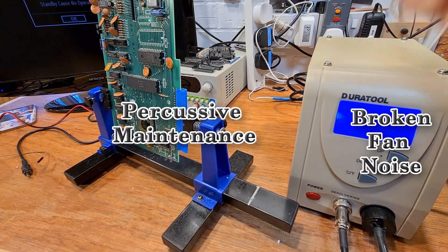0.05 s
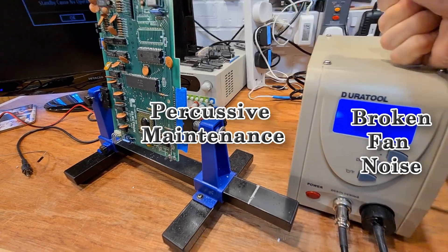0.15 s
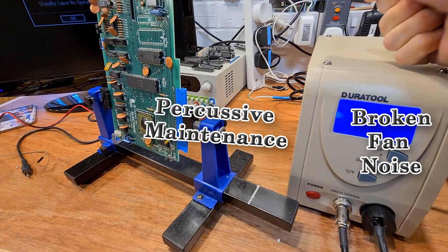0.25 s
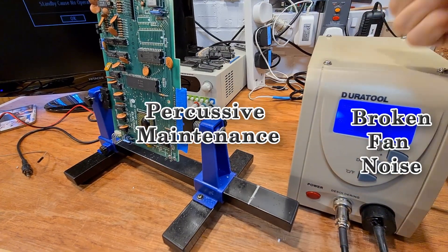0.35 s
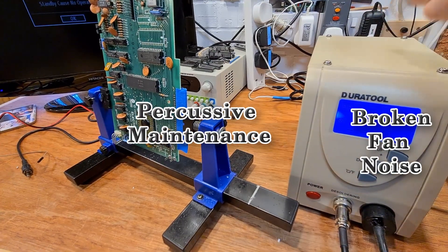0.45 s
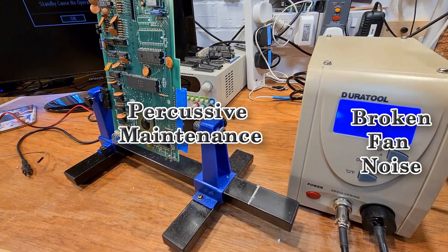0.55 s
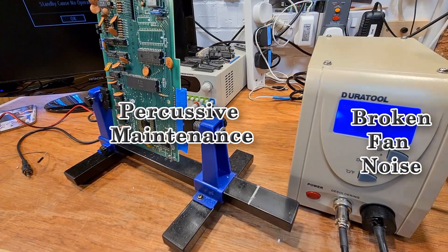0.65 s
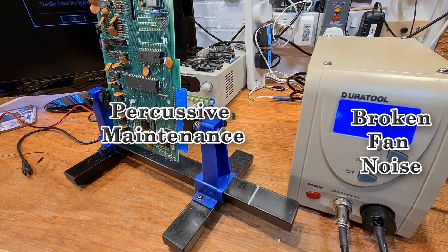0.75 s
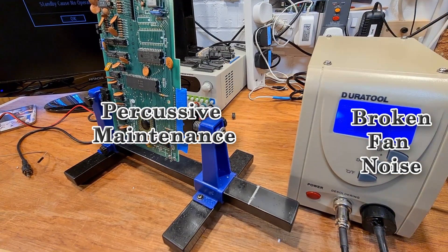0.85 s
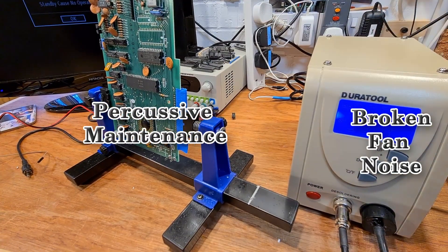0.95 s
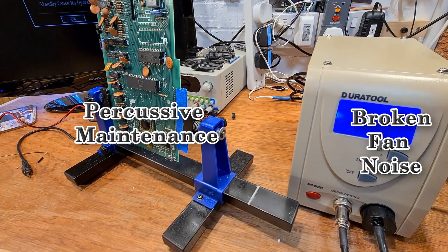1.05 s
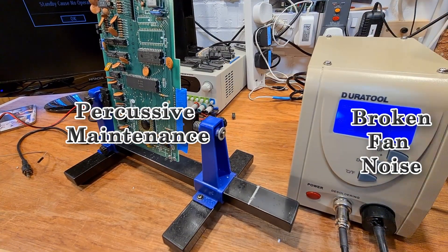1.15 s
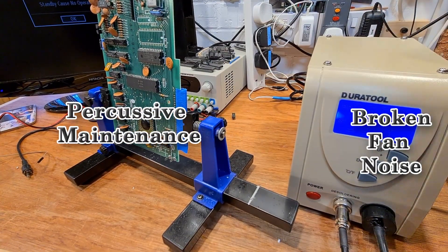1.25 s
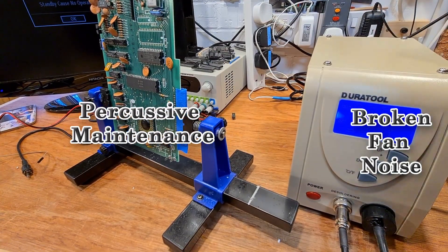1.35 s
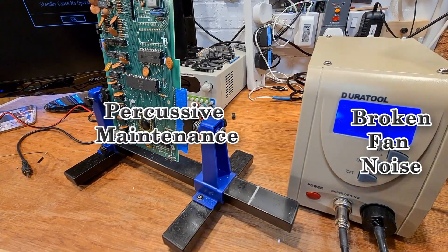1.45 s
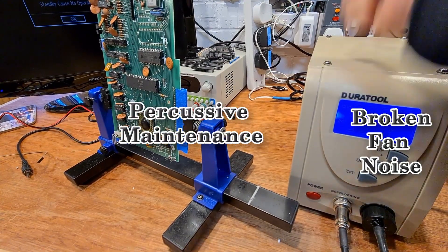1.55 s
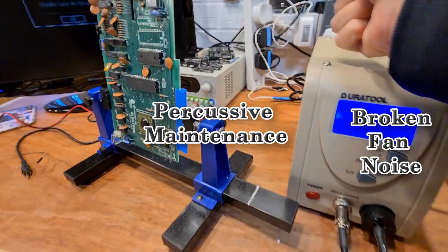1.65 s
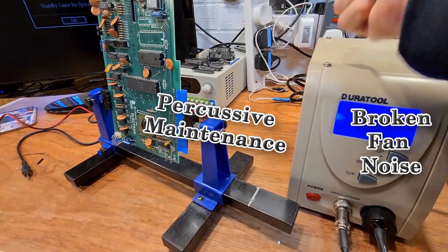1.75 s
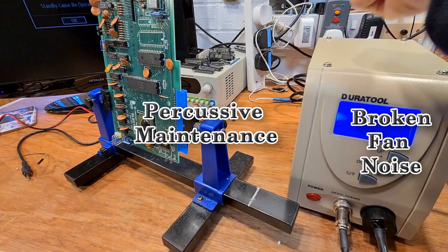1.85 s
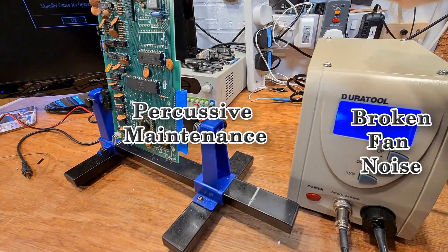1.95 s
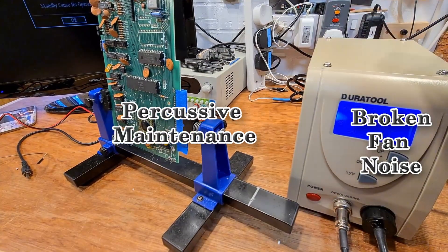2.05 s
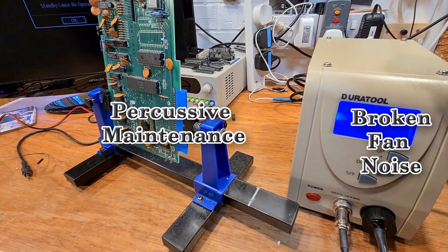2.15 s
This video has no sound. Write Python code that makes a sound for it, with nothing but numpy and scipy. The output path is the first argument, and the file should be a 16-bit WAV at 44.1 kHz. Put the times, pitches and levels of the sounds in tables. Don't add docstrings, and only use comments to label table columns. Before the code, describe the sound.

Buzzing faulty fan in a metal case, struck by two hard knocks that briefly lower its pitch

```python
import sys
import numpy as np
from scipy import signal
from scipy.fft import rfft, irfft, next_fast_len
from scipy.io import wavfile

SR = 44100
rng = np.random.default_rng(int(sys.argv[2]) if len(sys.argv) > 2 else 0)


def wav_out(sig):
    wavfile.write(sys.argv[1], SR, np.round(np.clip(np.atleast_2d(sig).T, -1, 1) * 32767).astype(np.int16))


def to_linear_factor(level_db):
    exponent = np.asarray(level_db, float) / 20
    return 10 ** exponent


N = 97020

# pitch_hz, level_db_per_hz
FLOOR_COLOUR = [(25, -34), (65, -1.5), (120, -10), (280, -12), (390, -27), (750, -17.5), (930, -38),
                (1600, -24)]
FLOOR_DB, FLOOR_PATCH_DB = -54, 0.5
# pitch_hz, t60_s (time to fade by 60 dB), level_db
FLOOR_TONES = [(71, 0.75, -58.5), (164, 0.6, -56), (301, 0.083, -54), (541.4, 0.41, -68), (735, 0.15, -66)]
SWAY_START_S, SWAY_RISE_S, SWAY_HZ, SWAY_DB = 1.89, 0.1, 60.6, -39.5

GRIND_ALIKE, FLOOR_ALIKE, SHUDDER_ALIKE = 0.19, 0.8, 0.62

KNOCKS_S = [
    .205,
    1.695,
]
# pitch_hz, level_db_per_hz
SHUDDER_COLOUR = [(100, 0), (350, -1), (800, -15), (1500, -17), (3000, -27), (7000, -35), (9000, -44),
                  (15000, -40)]
SHUDDER_DB, SHUDDER_HOLD_S, SHUDDER_T60_S = [-18.5, -20], 0.054, 0.13

# start_s, level_db, pitch_hz, ring_ms
CHATTER = [(.2025, -18, 3000, 6), (.2042, -21, 11000, 4), (.2145, -13, 3600, 9), (.2148, -22, 9500, 7),
           (.231, -17, 5500, 7), (.2385, -17, 5000, 5), (.2465, -19, 5000, 5), (.254, -19, 2400, 6),
           (.261, -22, 3500, 5), (.2775, -20, 6000, 6), (1.697, -11, 12000, 8), (1.6975, -16, 2900, 9),
           (1.7015, -19, 2900, 5), (1.7185, -19, 6000, 5), (1.7295, -19, 6500, 5), (1.730, -24, 11000, 4),
           (1.736, -18, 5000, 8), (1.7535, -14, 4600, 7), (1.754, -20, 10500, 6), (1.7685, -18, 5000, 5)]

# start_s, level_db, contact_ms
PUSHES = [
    (0.2025, -26, 0.89),
    (.207, -11, 1.97),
    (0.2132, -11.5, 0.88),
    (.217, -14.5, 0.21),
    (.250, -27.5, 1.43),
    (1.693, -16, 1.8),
    (1.6957, -8.5, 1.12),
    (1.7084, -17.5, 0.4),
    (1.726, -22, 2.1),
    (1.755, -30, 1.6),
]
# pitch_hz, first_knock_db, second_knock_db, t60_s
CASE_MODES = [(42.9, -19.5, -12.5, 0.68), (63.3, -3, -12.5, 0.47), (76.9, -5.5, -14.5, 0.47),
              (108.4, -22, -3, 0.19), (190.9, -7, -11.5, 0.278), (231.9, -8, -2.5, 0.2),
              (318.4, -7, -6.5, 0.16), (401, -9, -27, 0.12), (557, -22, -11, .12),
              (748.7, -12.5, -14, 0.18), (216, -2, 1, 0.068), (1115, 1, -18, 0.048), (1276, 0, -11, 0.15),
              (1953, -9, -10, 0.3)]

FREE_HZ, START_CYCLE = 213, 0.1
BRAKE_HZ, BRAKE_S, RECOVER_S = 21.07, 0.03, 0.33
LEFTOVER_HZ = 2.5
HUM_DB, HUM_WOBBLE_DB = -30.5, 0.83
OCTAVE_DB = -23
# multiple_of_hum, level_db
OVERTONES = [(3, -49), (4, -52), (5, -37), (6, -30), (7, -37), (22 / 3, -32), (8, -41), (9, -38), (10, -37),
             (11, -38), (34 / 3, -37), (13, -34), (40 / 3, -29), (14, -32), (46 / 3, -29), (17, -32),
             (55 / 3, -30), (61 / 3, -29), (65 / 3, -27)]
OVERTONE_DB, OVERTONE_WAVER_DB = 7, 2.0
BRAKED_OVERTONE_DB = 18

# place_cycles (0 to 1), level_db
RUBS = [
    (.5, 9),
    (.05, -8),
]
RUB_DB, RUB_SPREAD_DB, RUB_DRIFT_DB = -39, 1, 1.5
RUB_JITTER = 0.012
BRAKED_RUB_DB = 2.5
TICK_TOP_HZ = 7400
GRIND_DB, GRIND_FLUTTER_DB = 0.5, 0.6
GRIND_GATE = 0.35
# pitch_hz, level_db_per_hz
RUB_COLOUR = [(1500, -10), (3000, -8), (4650, -1), (6100, -13), (7700, -8.5), (9900, -12), (12700, -7.5),
              (15500, -9)]
# pitch_hz, level_db
RUB_DIP = [(1, 1), (7750, 0), (8050, -10.5), (9500, -7), (9800, 0.5)]
# pitch_hz, width_hz, level_db
FRAME = [(1970, 64, 4), (3007, 23, 0.5), (3590, 76, 3), (3870, 30, -8), (4400, 27, 6), (4654, 57, 2),
         (4830, 99, -1), (5403, 20, 3.5), (7730, 450, -2.5), (12900, 110, -5), (13700, 150, -21)]
FRAME_DB = -45.5

# pitch_hz, left_minus_right_db, left_lead_radians
PAIR = [(60, -0.5, 0.5), (216, -1.5, -0.08), (564, 1, -1.5), (1200, -3, -2), (2220, 1, -5.0),
        (4280, 5.5, -6.5), (8000, 4, -10.5), (15500, 7, -20.0)]
HUM_LEFT_DB = 4.5
ECHO_DB, ECHO_T60_S, ECHO_LOW_HZ = -8, 0.1, 510


def at_hz(points, hz, column):
    p = np.array(points, float)
    return np.interp(np.log(np.maximum(hz, 1)), np.log(p[:, 0]), p[:, column])


def rms_one(x):
    return x / np.sqrt(np.mean(x ** 2) + 1e-20)


def colour(x, points):
    size = 2 * next_fast_len(N)
    hz = np.arange(size // 2 + 1) * SR / size
    bass_fall_db = 40 * np.log10(np.clip(hz / points[0][0], 1e-3, 1))
    db = at_hz(points, hz, column=1) + bass_fall_db
    cepstrum = irfft(np.log(to_linear_factor(db)), size)
    cepstrum[1:size // 2] *= 2
    cepstrum[size // 2 + 1:] = 0
    response = np.exp(rfft(cepstrum))
    return irfft(rfft(x, size) * response, size)[..., :N]


def drift(rate_hz):
    r = np.exp(-2 * np.pi * rate_hz / SR)
    slow = signal.lfilter([1], [1, -2 * r, r * r], rng.standard_normal(N + SR))[SR:]
    return rms_one(slow - slow.mean())


def hiss(alike):
    shared, left, right = rng.standard_normal((3, N))
    alike = np.clip(alike, 0, 1)
    return np.sqrt(alike) * shared + np.sqrt(1 - alike) * np.array([left, right])


def ring(x, hz, t60):
    r = to_linear_factor(-60 / (t60 * SR))
    w = 2 * np.pi * hz / SR
    return signal.lfilter([0, np.sin(w)], [1, -2 * r * np.cos(w), r * r], x + 1e-18)


def pair(x):
    size = next_fast_len(N + SR // 4)
    hz = np.arange(size // 2 + 1) * SR / size
    t = np.arange(SR // 5) / SR
    tail = rng.standard_normal((2, len(t))) * to_linear_factor(-60 * t / ECHO_T60_S) * (t > 0.001)
    tail = tail / np.sqrt(np.sum(tail ** 2, axis=1, keepdims=True))
    bright = hz ** 2 / (hz ** 2 + ECHO_LOW_HZ ** 2)
    echo = rfft(tail, size) * to_linear_factor(ECHO_DB) * bright
    side = np.array([[0.5], [-0.5]])
    loudness = to_linear_factor(side * at_hz(PAIR, hz, column=1))
    arrival = np.exp(1j * (side + 0.5) * at_hz(PAIR, hz, column=2))
    return irfft(rfft(x, size) * loudness * (arrival + echo), size)[:, :N]


def workshop_floor():
    t = np.arange(N) / SR
    noise = rms_one(colour(hiss(FLOOR_ALIKE), FLOOR_COLOUR + [(4000, -55)]))
    out = to_linear_factor(FLOOR_DB + FLOOR_PATCH_DB * drift(3.9)) * noise
    for hz, t60, db in FLOOR_TONES:
        out = out + to_linear_factor(db) * rms_one(ring(hiss(FLOOR_ALIKE), hz, t60))
    sway_rise = np.clip((t - SWAY_START_S) / SWAY_RISE_S, 0, 1)
    sway = to_linear_factor(SWAY_DB + 0.82 * drift(6.0)) * sway_rise * np.sin(2 * np.pi * SWAY_HZ * t)
    return out + sway


def shudder():
    t = np.arange(N) / SR
    shape = 0
    for start, db in zip(KNOCKS_S, SHUDDER_DB):
        since = t - start
        rise = np.clip(since / 0.0078 + 1, 0, 1)
        sag_db = 2.33 * np.clip(since / SHUDDER_HOLD_S, 0, 1)
        fade_db = 60 * np.maximum(since - SHUDDER_HOLD_S, 0) / SHUDDER_T60_S
        shape = shape + rise * to_linear_factor(db - sag_db - fade_db)
    noise = rms_one(colour(hiss(SHUDDER_ALIKE), SHUDDER_COLOUR))
    return noise * shape * to_linear_factor(3.5 * drift(80.0))


def chatter():
    out = np.zeros(N)
    t = np.arange(1500) / SR
    for start, db, hz, ring_ms in CHATTER:
        rise = np.minimum(t / 0.0006, 1)
        fade = to_linear_factor(-60000 * t / (2.5 * ring_ms))
        burst = rng.standard_normal(len(t)) * rise * fade
        edges = [hz / 1.45, min(hz * 1.59, 0.45 * SR)]
        band = signal.butter(2, edges, "band", fs=SR, output="sos")
        burst = signal.sosfilt(band, burst)
        first = int(start * SR)
        out[first:first + len(t)] += to_linear_factor(db) * burst / np.abs(burst).max()
    return out


def case():
    t = np.arange(N) / SR
    push = np.zeros((2, N))
    for start, db, ms in PUSHES:
        progress = np.clip((t - start) * 1000 / ms, 0, 1)
        knock = int(start > 1)
        push[knock] += to_linear_factor(db) * np.sin(np.pi * progress) ** 2 * 2000 / (ms * SR)
    out = np.zeros(N)
    for hz, first_db, second_db, t60 in CASE_MODES:
        out += ring(to_linear_factor(first_db) * push[0] + to_linear_factor(second_db) * push[1], hz, t60)
    return out


def fan_speed():
    t = np.arange(N) / SR
    braked = LEFTOVER_HZ / BRAKE_HZ * np.exp(-t / RECOVER_S)
    for start in KNOCKS_S:
        since = np.maximum(t - start, 0)
        braked = braked + (1 - np.exp(-since / BRAKE_S)) * np.exp(-since / RECOVER_S)
    cycles = START_CYCLE + np.cumsum(FREE_HZ - BRAKE_HZ * braked) / SR
    return braked, cycles


def hum(braked, cycles):
    overtones = 0
    for multiple, db in OVERTONES:
        level = to_linear_factor(db + OVERTONE_DB + OVERTONE_WAVER_DB * drift(2.7))
        overtones = overtones + level * np.sin(2 * np.pi * (multiple * cycles + rng.random()))
    octave = to_linear_factor(OCTAVE_DB) * (braked + 0.04) * np.sin(4 * np.pi * cycles)
    tone = to_linear_factor(HUM_DB + HUM_WOBBLE_DB * drift(9.5)) * (np.sin(2 * np.pi * cycles) + octave)
    overtones = to_linear_factor(HUM_DB - BRAKED_OVERTONE_DB * braked) * overtones
    return np.sqrt(2) * tone, np.sqrt(2) * overtones


def rub(braked, cycles):
    ticks = np.zeros(N)
    turns = np.arange(int(cycles[-1]) + 1)
    for place, db in RUBS:
        jitter, size = rng.standard_normal((2, len(turns)))
        at = np.searchsorted(cycles, turns + place + RUB_JITTER * jitter)
        at = np.clip(at, 0, N - 1)
        ticks[at] += to_linear_factor(db + RUB_SPREAD_DB * size + RUB_DRIFT_DB * drift(21.6)[at])
    soften = signal.butter(2, TICK_TOP_HZ, fs=SR, output="sos")
    ticks = signal.sosfilt(soften, rms_one(ticks))

    gate = 1 + GRIND_GATE * np.cos(2 * np.pi * (cycles - RUBS[0][0]))
    grind = to_linear_factor(GRIND_DB + GRIND_FLUTTER_DB * drift(26.0)) * gate * hiss(GRIND_ALIKE)
    force = (ticks + grind) * to_linear_factor(BRAKED_RUB_DB * braked)

    frame = 0
    for k, (hz, width_hz, db) in enumerate(FRAME):
        frame = frame + (-1) ** k * to_linear_factor(db) * rms_one(ring(force, hz, 2.03 / width_hz))
    scrape = rms_one(colour(force, RUB_COLOUR))
    return to_linear_factor(RUB_DB) * colour(scrape + to_linear_factor(FRAME_DB - RUB_DB) * rms_one(frame), RUB_DIP)


def scene():
    braked, cycles = fan_speed()
    tone, overtones = hum(braked, cycles)
    knocks = shudder() + chatter() + case()
    rest = workshop_floor() + knocks + overtones + rub(braked, cycles)
    lean = to_linear_factor(HUM_LEFT_DB * np.array([[0.5], [-0.5]]))
    return pair(tone) * lean + pair(rest)


def band_limit(x):
    return signal.sosfilt(signal.butter(12, 16530, fs=SR, output="sos"), x)


def record(dry):
    bass_cut = signal.butter(6, 35, "high", fs=SR, output="sos")
    top_cut = signal.ellip(12, 0.5, 70, 15950, fs=SR, output="sos")
    x = signal.sosfilt(bass_cut, dry)
    x = 1.5 * np.tanh(x / 1.5)
    x = signal.sosfilt(top_cut, x)
    return band_limit(x)


dry = scene()
out = record(dry)
wav_out(out)
```